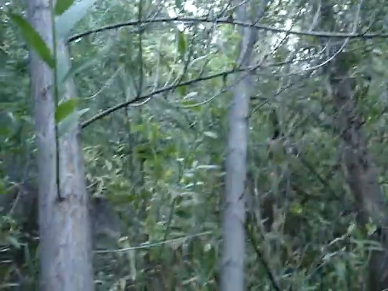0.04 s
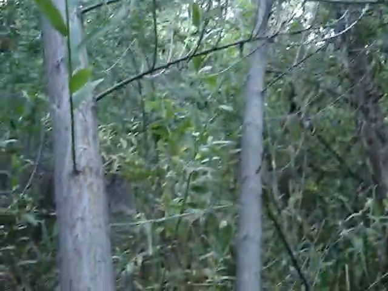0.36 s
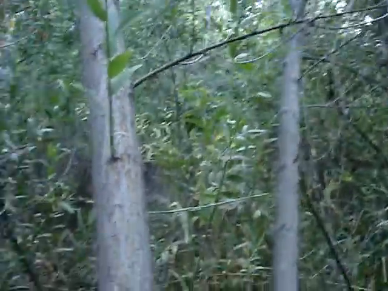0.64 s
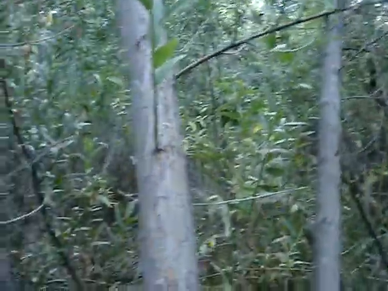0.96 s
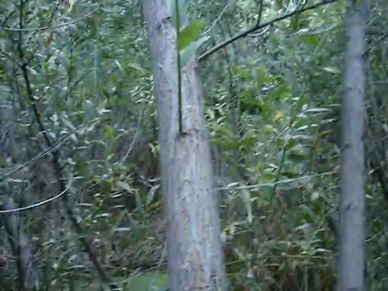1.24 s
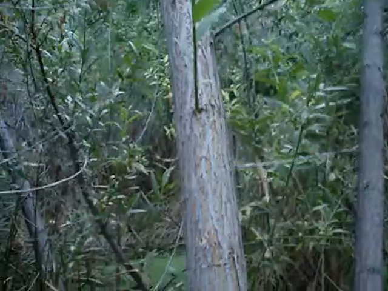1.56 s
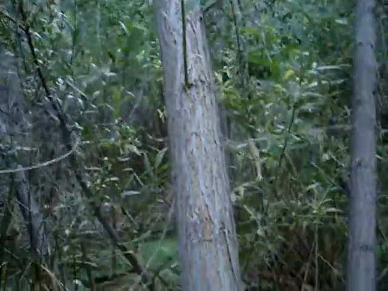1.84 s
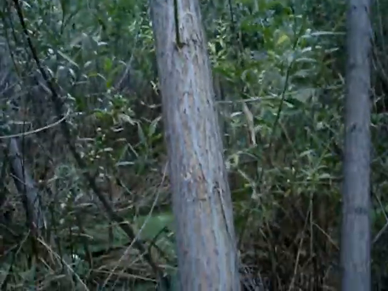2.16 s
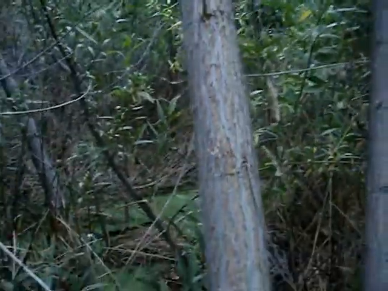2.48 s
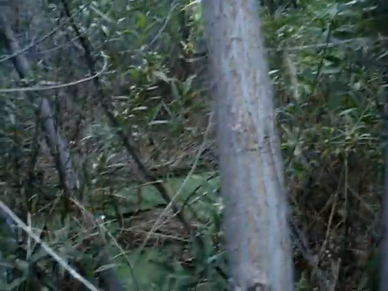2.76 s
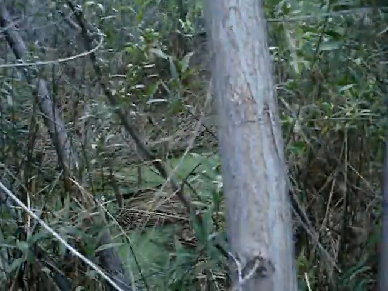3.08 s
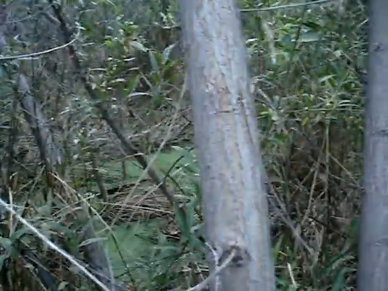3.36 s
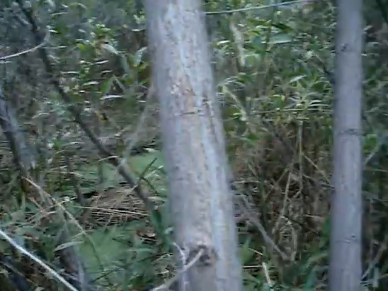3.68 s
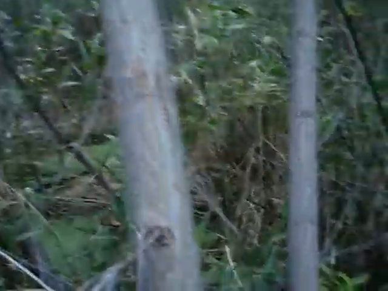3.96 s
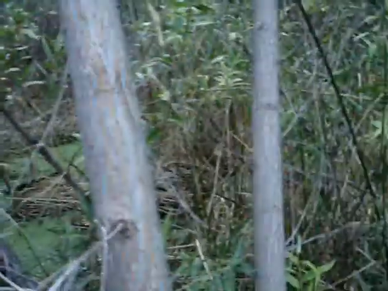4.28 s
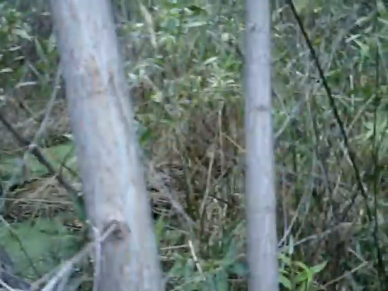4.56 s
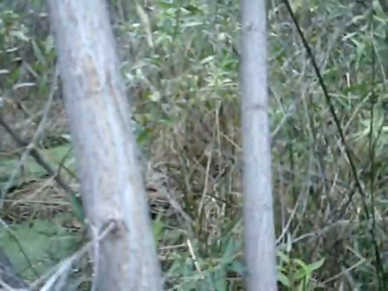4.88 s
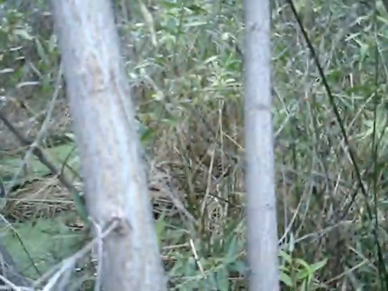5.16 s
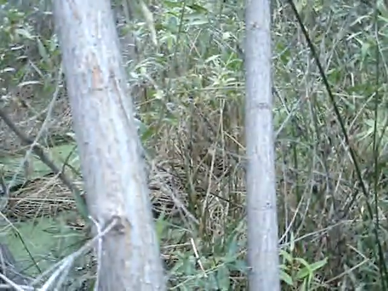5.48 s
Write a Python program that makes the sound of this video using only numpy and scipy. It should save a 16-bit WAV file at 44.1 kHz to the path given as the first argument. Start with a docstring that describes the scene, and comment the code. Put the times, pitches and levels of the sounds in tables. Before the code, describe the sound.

Quiet wetland woods, heard through a hand-held camera with soft hiss and a thin whine. A bird in the reeds gives three quick, piping notes and a low, rolling growl, repeating the phrase four times at even intervals. A few sharp twig clicks sound nearby at the start, and a soft knock, a rustle and one more click toward the end. Insects lisp faintly throughout, and other birds call thinly far off.

```python
"""A black rail calls "ki-ki-ki-krr" four times from a thicket at the edge of a marsh: three falling
whistles, each starting higher and louder than the last, then a warbled growl. Its syrinx makes the tone,
its throat picks out the overtones, and trunks and reeds scatter the calls. Twigs snap close by, an insect
lisps and small birds call faintly, over a wash of distant air and a hand-held camera's hiss and whine."""
import sys
import numpy as np
from scipy import signal
from scipy.fft import rfft, irfft
from scipy.io import wavfile

SR = 44100
rng = np.random.default_rng(int(sys.argv[2]) if len(sys.argv) > 2 else 0)


def master(y):
    """Save y as 16-bit WAV."""
    cut = np.clip(np.atleast_2d(y).T, -1, 1)
    pcm = np.round(cut * 32767)  # scale
    wavfile.write(sys.argv[1], SR, pcm.astype(np.int16))


N = 252252
TIME = np.arange(N) / SR

# the rail's phrases: start_s, beat_s, first_pitch_hz, first_octave_db, crescendo_db, growl_s, growl_db
RAIL_PHRASES = [(-.036, .147, 1610, -50, 1.2, .14, -48.5), (1.654, .137, 1590, -45, 2, 0.16, -51),
                (3.303, .1485, 1568, -44, 1.5, .16, -49.5), (4.862, 0.14, 1538, -48, 3.5, .16, -49)]


def undb(db):
    """Decibels to gain."""
    return 10 ** (np.asarray(db) / 20)


def clock(length_s):
    """Sample times across one sound."""
    return np.arange(int(length_s * SR)) / SR


def add(track, start_s, sound):
    """Lay a sound into a track."""
    at = int(start_s * SR) + np.arange(len(sound))
    inside = (at >= 0) & (at < N)
    track[at[inside]] += sound[inside]


def contour(points, f):
    """Gain at frequencies f of an EQ curve drawn through (frequency_hz, gain_db) points."""
    hz, db = np.transpose(points)
    return undb(np.interp(np.log(f), np.log(hz), db))


def noise(colour):
    """Noise of rms 1, coloured by a gain function of frequency."""
    f = np.fft.rfftfreq(N, 1 / SR) + 1e-6
    x = irfft(rfft(rng.standard_normal(N)) * colour(f), N)
    return x / x.std()


def band(hz, width_hz):
    """Noise in one steep resonance."""
    return noise(lambda f: 1 / (1 + ((f - hz) / width_hz * 2) ** 4) ** .5)


def wobble(rate_hz, samples=N):
    """Smooth random modulation with a spread of about 1."""
    return noise(lambda f: np.exp(-(f / rate_hz) ** 2))[:samples]


def gate(t, rise_s, fall_s):
    """Fade a note in and out."""
    return np.clip(t / rise_s, 0, 1) * np.clip((t[-1] - t) / fall_s, 0, 1)


def syrinx(hz, jitter):
    """Phase of a bird's vibrating membrane, its pitch trembling a little."""
    return 2 * np.pi * np.cumsum(hz * (1 + jitter * wobble(390, len(hz)))) / SR


def wood_ring(modes, give_s=.00022):
    """Modes ring as the wood gives way, neighbours in opposite phase; peak 1."""
    t = clock(.1)
    x = sum((-1) ** k * undb(db) * np.sin(2 * np.pi * hz * t) * undb(-60 * t / t60_s)
            for k, (hz, db, t60_s) in enumerate(modes))
    x *= 1 - np.exp(-t / give_s)
    return x / np.abs(x).max()


def whistle_time(start_s, beat_s, k, drag=.024):
    """Cue for whistle k of a phrase; the third comes a little late."""
    return start_s + k * beat_s * (1 + drag * (k - 1))


def rail_whistles(second_hz=1639, third_hz=1719, end_hz=1397, fundamental_db=-57, sag=.502):
    """Each whistle holds its pitch, sags, then drops as the pressure ends; the throat favours the octave."""
    out = np.zeros(N)
    for start_s, beat_s, first_hz, octave_db, crescendo_db, _, _ in RAIL_PHRASES:
        for k, top_hz in enumerate([first_hz, second_hz, third_hz]):
            t = clock(.0565 + k * .0028)
            progress = t / t[-1]
            fall = sag * progress ** 2 + (1 - sag) * progress ** 7
            phase = syrinx(top_hz + (end_hz - top_hz) * fall, jitter=.004)
            # the fundamental stays level; effort goes into the overtones
            overtones = np.sin(2 * phase) + undb(-32) * np.sin(3 * phase)
            tone = undb(fundamental_db) * np.sin(phase) + undb(octave_db + k * crescendo_db) * overtones
            shimmer = undb(2.57 * wobble(170, len(t)))
            note = np.sqrt(2) * gate(t, rise_s=.0044, fall_s=.0055) * shimmer * tone
            add(out, whistle_time(start_s, beat_s, k), note)
    return out


def thicket(calls, t60_s=.89, build_s=.038):
    """The direct calls, a few trunk echoes and a tail that builds as countless stems scatter them."""
    # tone of the tail off the stems: frequency_hz, gain_db
    stem_eq = [(800, -12), (1700, -12.5), (2600, -4), (3000, -14), (3200, -9), (3400, -9.5), (3800, -23),
               (9000, -10)]
    # slaps off near trunks: delay_s, gain_db
    trunk_echoes = [(0.024, -12), (.033, -10.5), (0.067, -14.5)]
    build = 1 - np.exp(-(TIME / build_s) ** 5)
    tail = rng.standard_normal(N) * build * undb(-60 * TIME / t60_s)
    scattered = signal.fftconvolve(calls, tail / np.linalg.norm(tail))
    f = np.fft.rfftfreq(2 * N, 1 / SR) + 1e-6
    out = calls + irfft(rfft(scattered, 2 * N) * contour(stem_eq, f))[:N]
    for delay_s, db in trunk_echoes:
        add(out, delay_s, undb(db) * calls)
    return out


def air_and_hiss(level_db=-53.5):
    """A steady bed of distant air and microphone hiss."""
    # tone of the bed: frequency_hz, relative_db
    bed_eq = [(18, -39), (30, -9.5), (123, -6), (230, -6), (266, -5.5), (301, -5), (538, -5), (720, -6.5),
              (1420, -10.5), (2870, -13.5), (3160, -15), (3480, -14.5), (5260, -17), (8150, -18),
              (9890, -21.5), (12900, -85), (21800, -120)]
    return undb(level_db) * noise(lambda f: contour(bed_eq, f))


def camera_whine(drift_rad=1.7):
    """The camera's thin, slightly unsteady whine over a low hum."""
    # camera tones: pitch_hz, level_db
    tones = [(242, -69.5), (7865, -75), (8000, -74), (8032, -79.5)]
    return sum(np.sqrt(2) * undb(db) * np.sin(2 * np.pi * hz * TIME + drift_rad * wobble(12))
               for hz, db in tones)


def insect_trill(pulse_hz=10):
    """A faint, narrow trill that pulses unevenly, swelling and ebbing."""
    # fader ride of the trill: time_s, level_db
    ride = [(.7, -80), (1.15, -70), (1.7, -77), (2.9, -74), (4.25, -76), (4.52, -63), (4.85, -78)]
    pulses = 1.5 * np.sin(np.pi * pulse_hz * TIME + wobble(4)) ** 2
    return undb(np.interp(TIME, *np.transpose(ride))) * pulses * band(5755, 67)


def twig_snaps():
    """Close twigs break, each with a short, bright ring."""
    # breaking twigs: start_s, peak_db, pitch_hz, t60_s
    snaps = [(0.2159, -33, 3070, 0.0023), (0.6324, -31.5, 2690, 0.0085), (0.8224, -35.5, 2450, 0.0041),
             (1.097, -44, 2620, 0.0052), (5.53, -38.5, 1610, 0.0068)]
    # modes of a twig: pitch_ratio, relative_db
    twig_modes = [(.76, 0), (1, -1), (1.14, 1.5), (2.85, -10)]
    out = np.zeros(N)
    for start_s, peak_db, hz, t60_s in snaps:
        modes = [(hz * ratio, db, t60_s) for ratio, db in twig_modes]
        add(out, start_s, undb(peak_db) * wood_ring(modes))
    return out


def bird_chip(start_s=.287, level_db=-43, decay_s=.0069, linger_s=.061):
    """One dry, high chip from a small bird lingers briefly in the leaves."""
    out, t = np.zeros(N), clock(.2)
    fade = np.exp(-t / decay_s) + undb(-12) * np.exp(-t / linger_s)
    hiss = band(7770, 2200) + undb(-9) * band(5550, 600)
    add(out, start_s, undb(level_db) * fade * hiss[:len(t)])
    return out


def insect_lisps(centre_hz=7000, slide_hz_per_s=4500, spread_hz=1050, length_s=.32, half_width_s=.073):
    """Short rasps slide down, about two a second; they ease off, then grow insistent."""
    # lisp cues: middle_s
    cues = [.42, .90, 1.41, 2.06, 2.62, 3.28, 3.858, 4.38, 4.93, 5.221, 5.52]
    # fader ride of the lisps: time_s, level_db
    ride = [(1.4, -60.5), (2.6, -64), (3.3, -61.5), (5.5, -57.5)]
    out = np.zeros(N)
    t = clock(length_s) - length_s / 2
    phase = 2 * np.pi * np.cumsum(centre_hz - slide_hz_per_s * t) / SR
    swell = np.exp(-(t / half_width_s) ** 2)
    for middle_s in cues:
        rasp = sum(wobble(spread_hz, len(t)) * wave(phase) for wave in (np.sin, np.cos))
        db = np.interp(middle_s, *np.transpose(ride)) + 2 * wobble(91, len(t))
        add(out, middle_s - length_s / 2, undb(db) * swell * rasp)
    return out


def rail_growls(open_hz=847, top_hz=990, end_hz=747, warble_hz=54, throat_open_hz=2590, throat_width_hz=480):
    """After the third whistle a warbling note opens low and accented, jumps up, then sinks and fades."""
    out = np.zeros(N)
    for start_s, beat_s, _, _, _, length_s, growl_db in RAIL_PHRASES:
        t = clock(length_s)
        opening = 1 / (1 + (t / .0192) ** 10)
        accent = np.exp(-(t / .035) ** 2)
        sinking_hz = np.linspace(top_hz, end_hz, len(t))
        hz = opening * open_hz + (1 - opening) * sinking_hz
        warble = 1 + .044 * np.cos(2 * np.pi * warble_hz * (t - .0075))
        phase = syrinx(hz * warble, jitter=.018)
        # the throat resonance slips from the third harmonic to the second and sinks with it
        throat_hz = opening * throat_open_hz + (1 - opening) * 2 * sinking_hz
        fundamental_db = -1 + 6 * (accent - opening)  # strongest just after the jump
        tone = sum(undb(db) * np.sin(k * phase) / np.hypot(1, (k * hz - throat_hz) / throat_width_hz * 2)
                   for k, db in enumerate([fundamental_db, 0, -4.5], 1))
        grit = 1 + .34 * wobble(240, len(t))
        envelope = undb(growl_db + 5 * accent - 5 * t / length_s) * gate(t, rise_s=.004, fall_s=.0091)
        add(out, whistle_time(start_s, beat_s, 2) + .132, np.sqrt(2) * envelope * grit * tone)
    return out


def rustles_thud_and_rasp(flicker_db=1.5):
    """Reed and litter rustles, the wood knock's dull thud (4.589 s), a second bird's faint rasp (5.402 s)."""
    # grainy noise swells: middle_s, half_width_s, centre_hz, width_hz, level_db
    swells = [(1.006, 0.041, 2500, 900, -59.5), (4.017, 0.004, 2800, 4000, -48.5),
              (4.589, 0.014, 560, 750, -49), (5.402, 0.091, 2900, 600, -54.5),
              (5.534, 0.055, 1377, 1394, -53.5), (5.71, 0.056, 2850, 700, -53.5)]
    out = np.zeros(N)
    for middle_s, half_width_s, hz, width_hz, db in swells:
        swell = np.exp(-((TIME - middle_s) / half_width_s) ** 2)
        out += undb(db + flicker_db * wobble(90)) * swell * band(hz, width_hz)
    return out


def bird_slurs(flicker_db=4):
    """Small, distant birds sing thin, wavering slurs."""
    # slurred notes: start_s, length_s, first_pitch_hz, last_pitch_hz, level_db
    slurs = [(3.209, 0.14, 10200, 8260, -60), (3.305, 0.12, 8600, 8520, -62), (4.398, 0.1, 1610, 1763, -58),
             (4.612, 0.12, 3400, 3405, -62), (4.775, 0.071, 1830, 1836, -62.5)]
    out = np.zeros(N)
    for start_s, length_s, first_hz, last_hz, db in slurs:
        t = clock(length_s)
        phase = syrinx(np.linspace(first_hz, last_hz, len(t)), jitter=.026)
        envelope = undb(db + flicker_db * wobble(70, len(t))) * gate(t, rise_s=.013, fall_s=.015)
        add(out, start_s, envelope * np.sin(phase))
    return out


def wood_knocks():
    """A soft double knock sets wood ringing."""
    # knocks: start_s, peak_db
    knocks = [(4.582, -39), (4.604, -52)]
    # modes of the wood: pitch_hz, relative_db, t60_s
    wood_modes = [(373, -10, 0.054), (530, 3.5, 0.055), (770, -14, 0.017), (870, 12, 0.015),
                  (1060, -3, 0.027), (1790, 1, .02)]
    out = np.zeros(N)
    for start_s, peak_db in knocks:
        add(out, start_s, undb(peak_db) * wood_ring(wood_modes))
    return out


def scene():
    """The rail, slurs and chip go through the thicket and the rest stays dry; both channels are alike."""
    birds = thicket(rail_whistles() + rail_growls() + bird_slurs() + bird_chip())
    insects = insect_trill() + insect_lisps()
    spot_sounds = twig_snaps() + wood_knocks() + rustles_thud_and_rasp()
    mono = birds + insects + spot_sounds + air_and_hiss() + camera_whine()
    return np.array([mono, mono])


def record(dry, cutoff_hz=10050):
    """The camera cuts the top end steeply."""
    return signal.sosfilt(signal.ellip(12, .2, 70, cutoff_hz, fs=SR, output="sos"), dry)


dry = scene()
out = record(dry)
master(out)
```